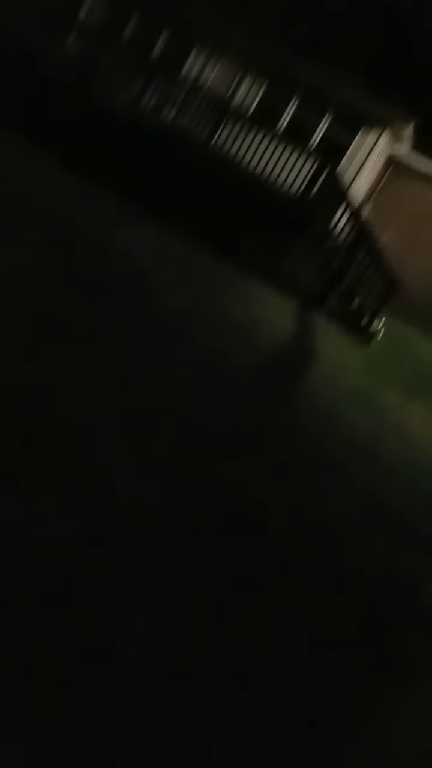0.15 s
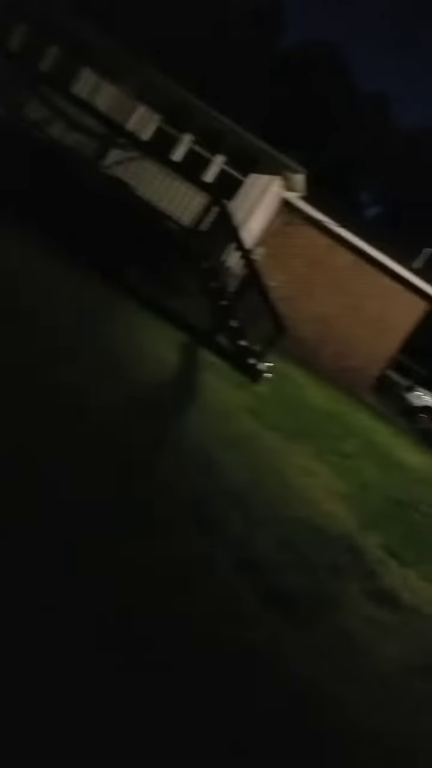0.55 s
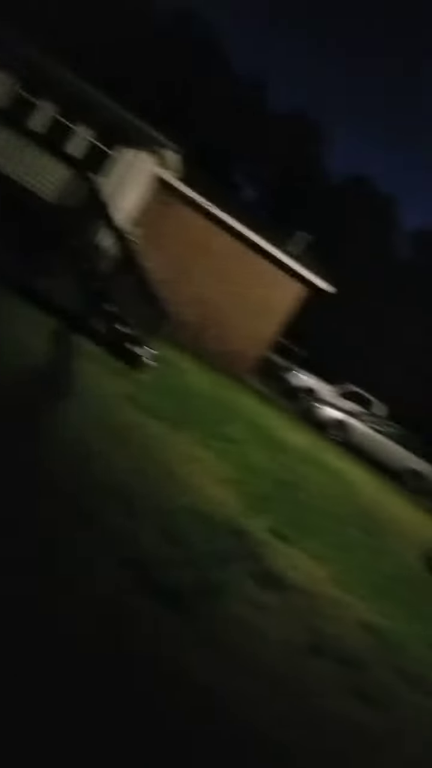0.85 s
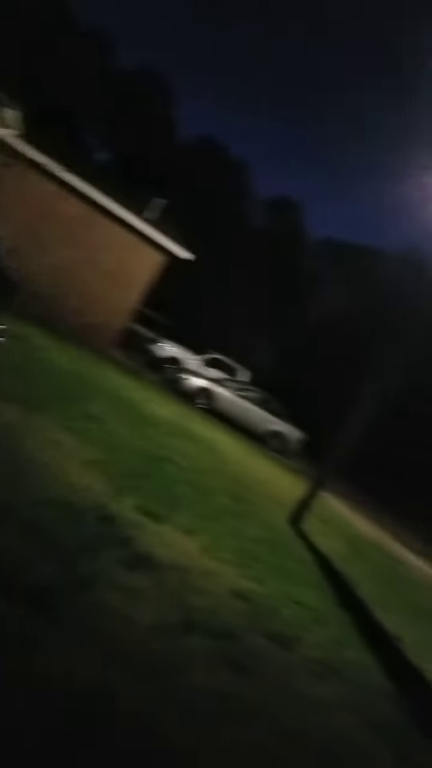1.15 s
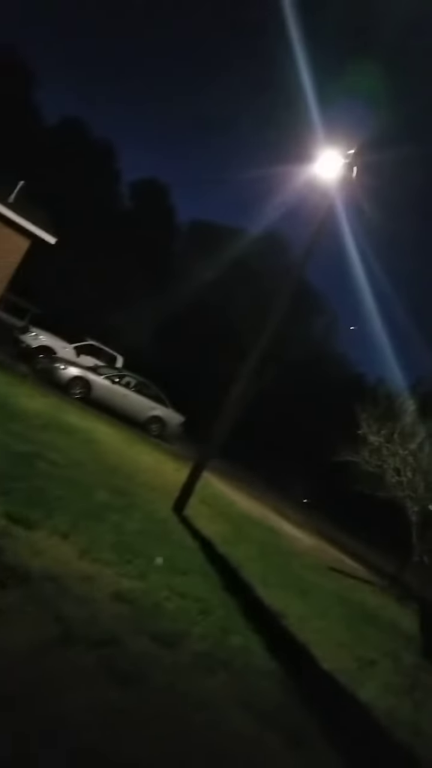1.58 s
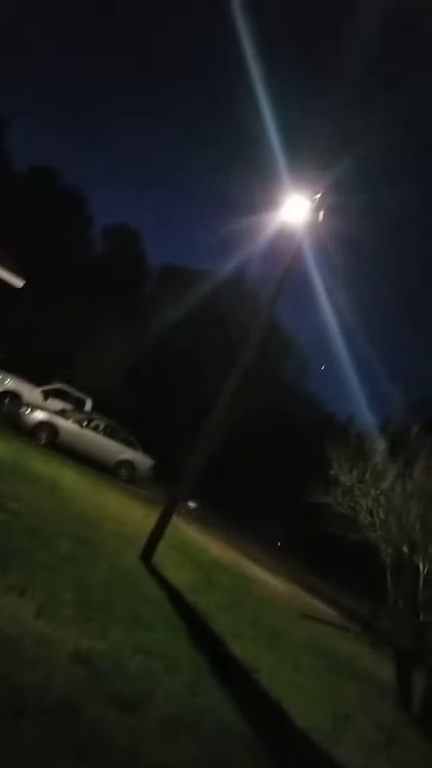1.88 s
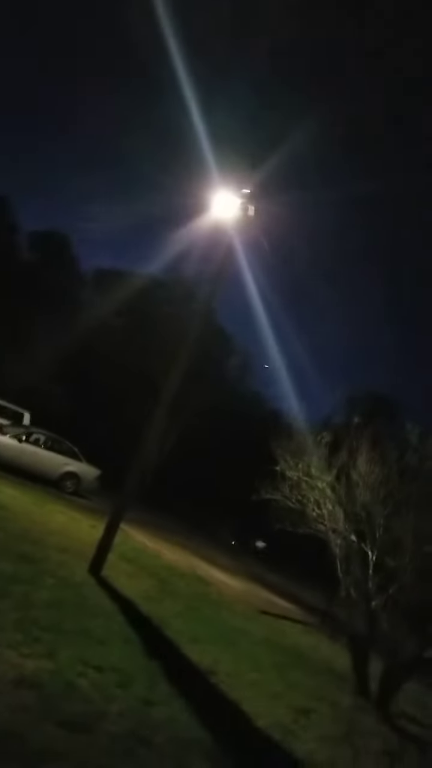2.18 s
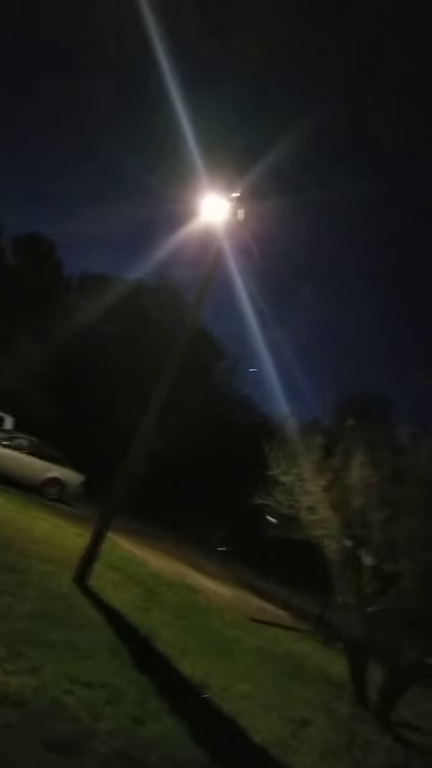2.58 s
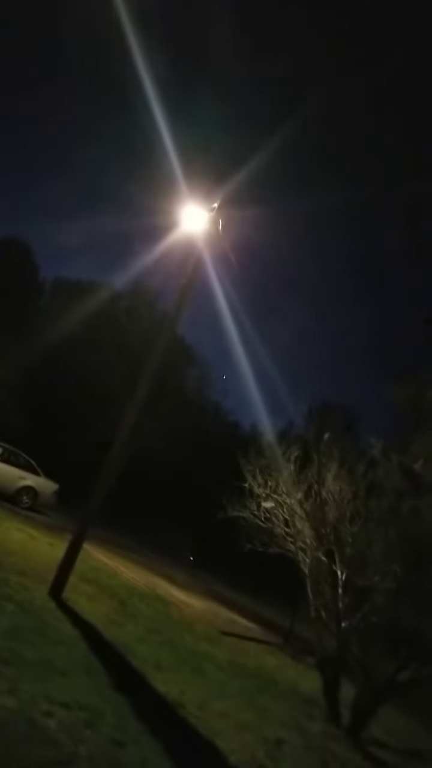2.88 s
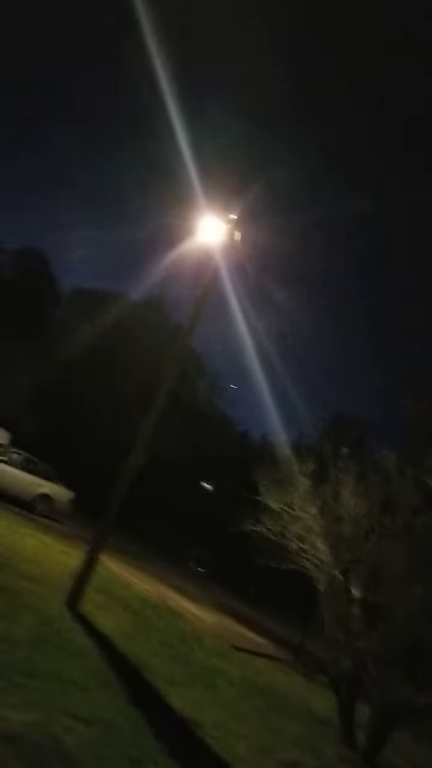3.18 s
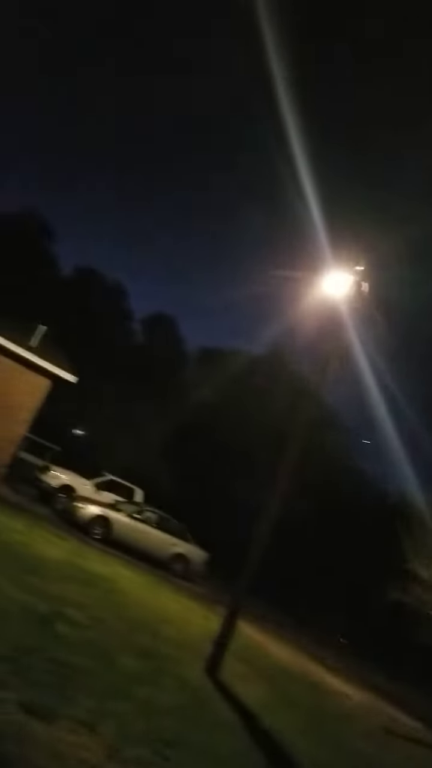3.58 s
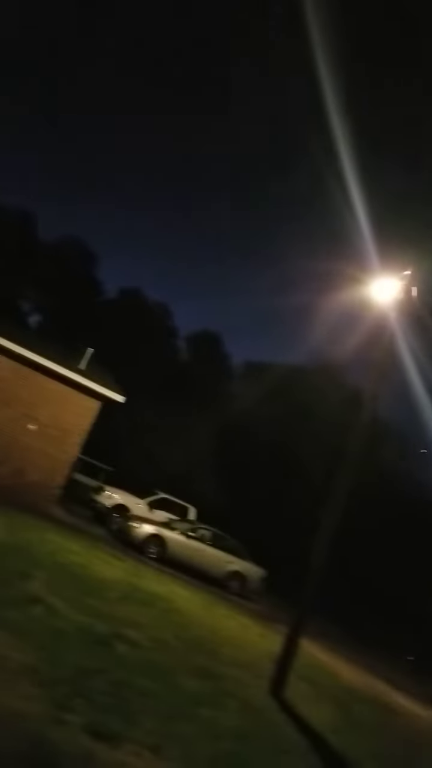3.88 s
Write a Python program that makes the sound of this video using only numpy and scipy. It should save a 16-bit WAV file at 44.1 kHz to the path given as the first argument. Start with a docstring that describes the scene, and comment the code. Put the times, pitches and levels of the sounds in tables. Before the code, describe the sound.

Four ringing nightjar calls echo off woods and walls at night, over soft handling rustle, clicks, low drone and faint hiss.

```python
"""Hand rub and rumble on a camera case over a night murmur, hiss and machine drone, with ticks and soft bumps
among the rubbing. From almost the start a whip-poor-will sings four times from the trees at the edge of a yard;
woods and walls answer. A farther bird shows only the peak of its song, and late on there are faint peeps,
as of a distant frog. Birds and peeps are gliding tones with synthetic echoes; rub, rumble, murmur and hiss
are filtered noise; drone and bumps are low sines; ticks are decaying sines with crackle."""
import sys
import numpy as np
from scipy import signal
from scipy.fft import rfft, irfft, next_fast_len
from scipy.io import wavfile
from scipy.ndimage import uniform_filter1d, map_coordinates

SR = 44100
rng = np.random.default_rng(int(sys.argv[2]) if len(sys.argv) > 2 else 0)


def store_wav(level_fs):
    """Save 16-bit WAV to argv[1]."""
    pcm = np.round(np.clip(np.atleast_2d(level_fs), -1, 1) * 32767)
    wavfile.write(sys.argv[1], SR, pcm.T.astype(np.int16))


N = 178252


def amp(db):
    """Decibels to gain."""
    return 10 ** (np.asarray(db) / 20)


def unit(x):
    """Scaled to rms 1."""
    return x / np.sqrt(np.mean(x ** 2) + 1e-20)


def along(points, hz):
    """(Hz, value) points interpolated on a log frequency axis."""
    point_hz, value = np.transpose(points)
    return np.interp(np.log(hz + 1), np.log(point_hz + 1), value)


def curves(rows):
    """One value per sample for each column after the time."""
    time_s, *columns = np.transpose(rows)
    return [np.interp(np.arange(N) / SR, time_s, column) for column in columns]


def wobble(rate):
    """A smooth random curve, rate knots a second."""
    knots = rng.standard_normal(int(N * rate / SR) + 4)
    return map_coordinates(knots, [np.arange(N) * rate / SR])


def filtered(x, response):
    """x times a response of frequency."""
    m = next_fast_len(N + SR // 2)
    return irfft(rfft(x, m) * response(np.fft.rfftfreq(m, 1 / SR)), m)[..., :N]


def panned(balance_db):
    """Left and right gains of constant power; positive favours left."""
    gains = amp(np.array([balance_db, -balance_db]) / 2).reshape(2, -1)
    return gains / np.sqrt(np.mean(gains ** 2, axis=0))


def rumble():
    """The moving hand shakes the case: low noise, independent at the two ports, in shared uneven lumps."""
    # level: time_s, level_db
    rumble_level = [(0, -68), (1.5, -62.5), (1.9, -68), (4.04, -71.5)]
    # spectrum: frequency_hz, relative_density_db
    rumble_spectrum = [(12, -21), (27, -5), (58, -12.5), (90, 0), (150, -3.5), (240, -7.5), (340, -16.5),
                       (600, -61)]
    lumps_db = 3
    level_db, = curves(rumble_level)
    shake = rng.standard_normal((2, N)) * amp(lumps_db * wobble(14))
    return amp(level_db) * unit(filtered(shake, lambda hz: amp(along(rumble_spectrum, hz))))


def rustle():
    """Hand and sleeve rub in strokes that swell and fade as the camera turns; each port colours the noise."""
    # hand strokes: peak_s, level_db, half_width_s, balance_db
    strokes = [(.06, -57, 0.15, -0.5), (.165, -57.5, 0.053, -2), (.5, -64, 0.68, 2.5),
               (.895, -55.5, 0.082, -6), (1, -57, 0.047, -6.5), (1.28, -62.5, 0.22, -7.5),
               (1.49, -64, 0.1, -3.5), (1.83, -68, .06, -4), (2.46, -71, 0.17, -19),
               (3.28, -57.5, 0.13, 1.5)]
    # rub spectrum at the left port: frequency_hz, relative_density_db
    rub_left = [(300, 9.5), (1000, 11.5), (2500, 6), (3500, 1.5), (6500, 3), (7400, -24), (11000, -14),
                (15000, -6)]
    # rub spectrum at the right port: frequency_hz, relative_density_db
    rub_right = [(300, 2), (1000, 7), (2500, 11.5), (3500, -8), (5500, -4.5), (6700, 3), (8000, -5.5),
                 (11000, 2.5), (12300, -11), (15000, -9)]
    stroke_shape = 1.46  # between a pointed (1) and a bell-shaped (2) swell
    grip_db, grip_ease_db_per_s = -70.5, 2.5  # faint rubbing between strokes, easing as the grip settles
    grain_db, scuff_db, pressure_db = 1.5, 1.26, 1  # fast, medium and slow unevenness

    t = np.arange(N) / SR
    power = (panned(0) * amp(grip_db - grip_ease_db_per_s * t)) ** 2
    for peak_s, level_db, half_width_s, balance_db in strokes:
        stroke = np.exp(-(abs(t - peak_s) / half_width_s) ** stroke_shape)
        power = power + (panned(balance_db) * amp(level_db) * stroke) ** 2
    uneven_db = pressure_db * wobble(24.97) + scuff_db * wobble(130) + grain_db * wobble(1100)
    grain = rng.standard_normal((2, N)) * amp(uneven_db)
    rub = filtered(grain, lambda hz: amp([along(rub_left, hz), along(rub_right, hz)]))
    return unit(rub) * np.sqrt(power)


def drone():
    """Distant machines: low wavering lines whose balance among themselves shifts as the camera turns."""
    # lines: frequency_hz, early_db, late_db
    drone_lines = [(57.9, -65.5, -61), (90.6, -66.5, -70.5), (115.3, -66.5, -64), (145.6, -67, -76)]
    turned = np.clip((np.arange(N) / SR - 1.5) / 0.37, 0, 1)
    out = np.zeros((2, N))
    for hz, early_db, late_db in drone_lines:
        drift = 0.22 * np.array([wobble(11.0), wobble(9.7)])  # each port hears its own mix of paths
        phase = 2 * np.pi * np.cumsum(hz + 0.99 * wobble(6)) / SR + drift
        level_db = early_db + (late_db - early_db) * turned + 1.8 * wobble(5.11)
        out += amp(level_db) * np.sin(phase)
    return np.sqrt(2) * out  # levels are rms


def night_air():
    """Low outdoor murmur, noise alike at both ports in the bass, plus a thin steady hiss."""
    # murmur level: time_s, level_db
    air_level = [(0, -66), (.55, -61), (1.5, -59), (2.55, -64), (4.04, -65.5)]
    # murmur spectrum: frequency_hz, relative_density_db
    air_spectrum = [(13, -30), (36, -16.5), (59, -7.5), (85, -8), (119, -5.5), (172, -12.5), (233, -14),
                    (348, -21.5), (764, -21.5), (1200, -24.5), (1560, -69), (2640, -120)]
    # hiss spectrum: frequency_hz, relative_density_db
    hiss_spectrum = [(900, -5), (2000, 12), (3200, -13.5), (6500, -15), (8000, -18), (11000, -12.5),
                     (15500, -12)]
    # left-right correlation: frequency_hz, likeness (1 = identical)
    likeness = [(40, 0.55), (70, 1), (120, 1), (300, 0.76), (1000, 0.82), (3000, 0.055)]

    def mid_side_response(hz):
        """Mid and side gains that give the wanted left-right likeness."""
        angle = np.arccos(np.clip(along(likeness, hz), -1, 1)) / 2
        return amp(along(air_spectrum, hz)) * [np.cos(angle), np.sin(angle)]

    level_db, = curves(air_level)
    mid, side = filtered(rng.standard_normal((2, N)), mid_side_response)
    murmur = unit(np.array([mid + side, mid - side]))
    hiss = filtered(rng.standard_normal((2, N)), lambda hz: amp(along(hiss_spectrum, hz)))
    return amp(level_db + wobble(6.6)) * murmur + amp(-64.5) * unit(hiss)


def ticks():
    """Each tap on the case is a decaying sine with a sharp edge and a trace of noise crackle."""
    # taps: start_s, level_db, balance_db, pitch_hz, ring_s (60 dB decay), crackle_db (re tap)
    taps = [(0.0645, -17.5, -30, 1410, 0.0028, -19), (.066, -41.5, -8, 218, 0.045, -7.5),
            (0.0686, -37, -24, 10800, 0.0029, 8.5), (0.116, -41.5, -4, 270, 0.023, -15.5),
            (.683, -39, -25, 937, 0.0058, -20), (1.2077, -28, -25, 1330, 0.0029, -10.5)]
    # crackle colour: frequency_hz, gain_db
    case_colour = [(100, -4), (2600, 11.5), (3600, 2), (7000, -8), (10700, -5), (12000, -12), (13000, -19)]
    snap_db = -5  # edge sample, re tap, before the case colour
    ringing, crackle = np.zeros((2, N)), np.zeros((2, N))
    t = np.arange(SR // 20) / SR
    for start_s, level_db, balance_db, pitch_hz, ring_s, crackle_db in taps:
        first = round(start_s * SR)
        at = slice(first, first + len(t))
        envelope = panned(balance_db) * amp(level_db - 60 * t / ring_s)
        ringing[:, at] += envelope * np.sin(2 * np.pi * pitch_hz * t)
        noise = amp(crackle_db) * rng.standard_normal(len(t))
        crackle[:, at] += envelope * (amp(snap_db) * (t == 0) + noise)
    return ringing + filtered(crackle, lambda hz: amp(along(case_colour, hz)))


def swell(start_s, length_s):
    """Progress 0-1 through a short sound, and its half-sine envelope."""
    progress = np.clip((np.arange(N) / SR - start_s) / length_s, 0, 1)
    return progress, np.sin(np.pi * progress)


def bumps():
    """The shifting grip pushes a few low cycles through the case into both ports."""
    # bumps: centre_s, peak_db, pitch_hz, length_s
    grip_bumps = [(0.165, -48.5, 59.6, 0.0966), (0.576, -57, 32.95, 0.125), (1.144, -55, 138.8, .07),
                  (1.44, -49, 118.5, 0.079), (1.538, -67, 36.12, .12), (1.608, -51, 105.3, .06)]
    out = np.zeros(N)
    for centre_s, peak_db, hz, length_s in grip_bumps:
        progress, envelope = swell(centre_s - length_s / 2, length_s)
        phase = 2 * np.pi * hz * length_s * progress + 1.123 * wobble(40)
        out += amp(peak_db) * envelope ** 2 * np.sin(phase)
    return out


def whistle(t, first_s, last_s, hz, db):
    """A pure, slightly unsteady note as a complex tone, sounding from first_s to last_s."""
    pitch_hz = uniform_filter1d(hz, size=260) * (1 + 0.0035 * wobble(120))
    gate = np.clip(np.minimum(t - first_s, last_s - t) / 0.0046 + .5, 0, 1)
    return gate * amp(db + 1.34 * wobble(90)) * np.exp(2j * np.pi * np.cumsum(pitch_hz) / SR)


def glide(t, note):
    """A whistle along (s, Hz, dB) points."""
    time_s, hz, db = np.transpose(note)
    return whistle(t, time_s[0], time_s[-1], np.interp(t, time_s, hz), np.interp(t, time_s, db))


def whip_note(t):
    """"Whip": after a brief accent the note swells as it arches over its top pitch, holds and stops."""
    start_s, top_s, end_s = .033, .1, 0.14  # from the start of the song
    first_hz, top_hz = 1528, 1859
    level_db, swell_db, swell_s = -2.5, 14, 0.053
    accent_db, accent_s = 10, 0.013
    s = np.clip(t, start_s, end_s)
    age_s = s - start_s
    hz = top_hz - (top_hz - first_hz) * ((s - top_s) / (start_s - top_s)) ** 2
    db = level_db - swell_db * np.clip(1 - age_s / swell_s, 0, 1)
    db = db + accent_db * np.exp(-age_s / accent_s)
    return whistle(t, start_s, end_s, hz, db)


def will_note(t):
    """"Will": warbles up to a peak, where it thins, falls quickly to rest, then droops and fades."""
    start_s, peak_s, fade_s, end_s = .449, .5, 0.5347, .574  # from the start of the song
    first_hz, peak_hz, rest_hz = 1862, 2810, 1995
    fall_s, droop_hz, droop_s = .015, 295, .006
    level_db, peak_db, fade_db_per_s = .5, -4, 277  # peak_db: change at the peak pitch
    warble_hz, warbles_per_s, crest_s = 190, 80, .008
    warble_db = 2.5  # each pitch crest is also a pulse of level
    s = np.clip(t, start_s, end_s)
    climb_hz = np.interp(s, [start_s, peak_s], [first_hz, peak_hz])
    warble = np.cos(2 * np.pi * warbles_per_s * (s - start_s - crest_s))
    warble = warble * np.clip((peak_s - s) / 0.011, 0, 1)
    fall_curve_hz = rest_hz + (peak_hz - rest_hz) * np.exp(-(abs(s - peak_s) / fall_s) ** 1.305)
    droop_curve_hz = droop_hz * np.exp((s - end_s) / droop_s)
    hz = np.where(s < peak_s, climb_hz + warble_hz * warble, fall_curve_hz - droop_curve_hz)
    height = (hz - rest_hz) / (peak_hz - rest_hz)
    db = level_db + peak_db * height + warble_db * warble - fade_db_per_s * np.maximum(s - fade_s, 0)
    return whistle(t, start_s, end_s, hz, db)


def yard(walls, near_db, woods_db, near_t60):
    """Stereo echo: quick scatter off nearby trunks, a few walls, and the long tail of the woods."""
    # woods decay: frequency_hz, t60_s
    woods_t60 = [(1400, 2.17), (2000, 1.98), (2900, 2.3)]
    t = np.arange(SR) / SR
    hz, frame_s, bins = signal.stft(rng.standard_normal((2, SR)), SR, nperseg=256)
    decay = amp(-60 * frame_s / along(woods_t60, hz)[:, None])
    tail = signal.istft(bins * decay, SR, nperseg=256)[1][:, :SR]
    tail = tail * (1 - np.exp(-t / 0.011))
    near = rng.standard_normal((2, SR)) * amp(-60 * t / near_t60) * (1 - np.exp(-t / 0.0045))
    echo = (amp(woods_db) * unit(tail) + amp(near_db) * unit(near)) / np.sqrt(SR)
    for delay_s, db in walls:
        port_delay_s = abs(delay_s + rng.normal(0, .0004, 2))
        echo[[0, 1], (port_delay_s * SR).astype(int)] += amp(db)
    return echo


def placed(song, balance_db, phase, echo, direct_db=0):
    """The direct tone at the two ports, left leading by phase (rad), plus its echoes."""
    ports = np.real(song * np.exp(.5j * phase * np.array([[1], [-1]])))
    direct = amp(direct_db) * panned(balance_db) * ports
    return direct + panned(balance_db=-4.0) * signal.fftconvolve(song.real[None], echo, axes=1)[:, :N]


def near_bird():
    """Whistled whip, poor and will; each song meets freshly drawn echoes."""
    # songs, direct sound growing as the camera turns to the bird:
    # start_s, direct_db (relative), will_extra_db, balance_db, left_lead_rad
    songs = [(.100, -4.5, -7, 3.5, -2.5), (1.028, -3.5, -3, -1, 3), (1.953, -1, 0, -2, 2.5),
             (2.894, 2, -1.5, -3.5, 2.5)]
    # "poor", a low, wavy rise: song_time_s, pitch_hz, relative_level_db
    poor_points = [(.262, 1330, -30.5), (.295, 1370, -19.5), (.325, 1427, -12.5), (.342, 1560, -10.5),
                   (.366, 1715, -11), (.392, 1505, -8.5), (.41, 1587, -11.5), (.424, 1790, -6.5),
                   (.446, 1550, -14)]
    # first echoes: delay_s, relative_level_db
    first_echoes = [(.034, -20), (.066, -20.5), (.105, -21)]
    whip_echo_db, poor_echo_db, will_echo_db = -2, 6, 0  # how strongly each note stirs the echoes
    out = np.zeros((2, N))
    for start_s, db, will_db, balance_db, phase in songs:
        t = np.arange(N) / SR - start_s
        echo = yard(first_echoes, near_db=-10.0, woods_db=-11.5, near_t60=0.32) * amp(0.042 * db)
        whip = placed(whip_note(t), balance_db, phase, echo * amp(whip_echo_db), db)
        # poor flutters and is the most blurred; port phase differs by note
        flutter = amp(2.64 * wobble(70))
        poor_echo = echo * amp(poor_echo_db)
        poor = placed(glide(t, poor_points) * flutter, balance_db + 3, phase - np.pi / 4, poor_echo, .5 * db)
        will_echo = echo * amp(will_echo_db + 0.22 * will_db)
        will = placed(will_note(t), balance_db - 6.0, phase + 1.16, will_echo, db + will_db)
        out += whip + poor + will
    return amp(-33.5) * out


def far_bird():
    """Only the highest note of the second bird carries: a whistled peak and its echoes."""
    # top note: note_time_s, pitch_hz, relative_level_db
    far_note = [(0, 2500, -10), (.02, 2850, -12.5), (.03, 3150, -4.5), (.043, 2560, 1), (.056, 2300, -23)]
    # songs: start_s, relative_level_db, balance_db, left_lead_rad
    far_songs = [(0.32, -13.5, 4, 1), (3.556, -14.5, -6.5, 0.34)]
    # strong echo: delay_s, relative_level_db
    far_echo = [(.048, -10)]
    t = np.arange(N) / SR
    out = np.zeros((2, N))
    for start_s, db, balance_db, phase in far_songs:
        echo = yard(far_echo, near_db=-2.0, woods_db=-13, near_t60=0.34)
        out += amp(db - 32.5) * placed(glide(t - start_s, far_note), balance_db, phase, echo)
    return out


def peeps():
    """Thin gliding sines from far off, blurred by echo."""
    # peeps: start_s, length_s, first_hz, last_hz, level_db
    peep_notes = [(3, .07, 3610, 3650, -77), (3.46, .06, 3410, 3470, -72), (3.52, .08, 3470, 3490, -69),
                  (3.86, .05, 3650, 3380, -73)]
    out = np.zeros(N)
    for start_s, length_s, first_hz, last_hz, db in peep_notes:
        progress, envelope = swell(start_s, length_s)
        hz = first_hz + (last_hz - first_hz) * progress
        out += amp(db) * envelope * np.sin(2 * np.pi * np.cumsum(hz) / SR)
    return placed(out, 0, 0, yard([], near_db=-5, woods_db=-14, near_t60=.2))


def scene():
    """Handling, background and birds together."""
    handling = rumble() + rustle() + ticks() + bumps()
    background = drone() + night_air()
    return handling + background + near_bird() + far_bird() + peeps()


def record(dry):
    """The camera keeps nothing above its band limit."""
    top_hz = 15800
    return filtered(dry, lambda hz: hz < top_hz)


dry = scene()
out = record(dry)
store_wav(out)
```